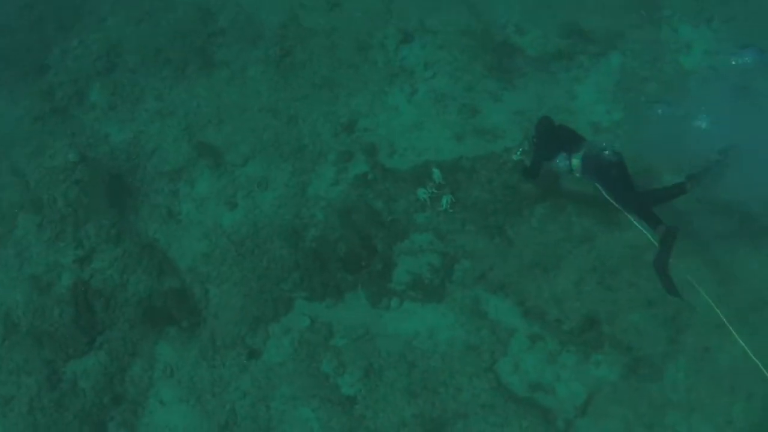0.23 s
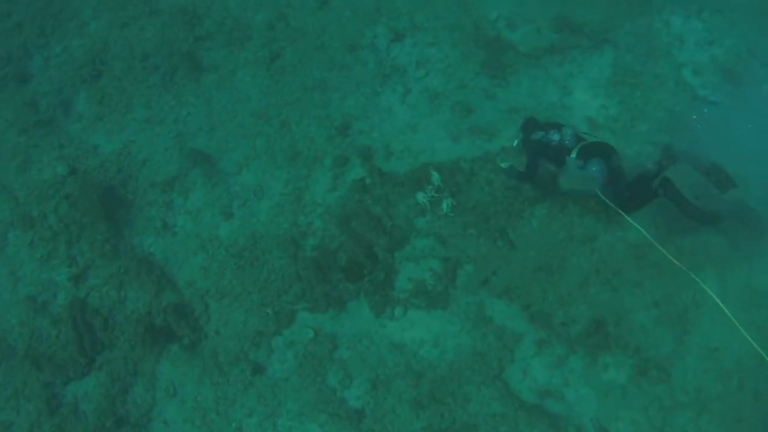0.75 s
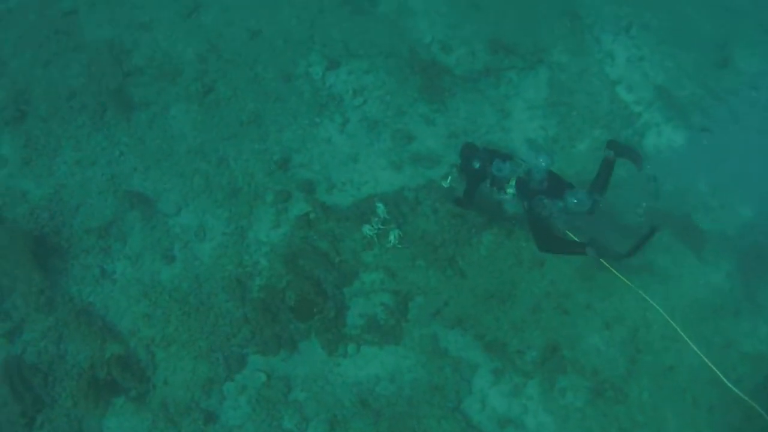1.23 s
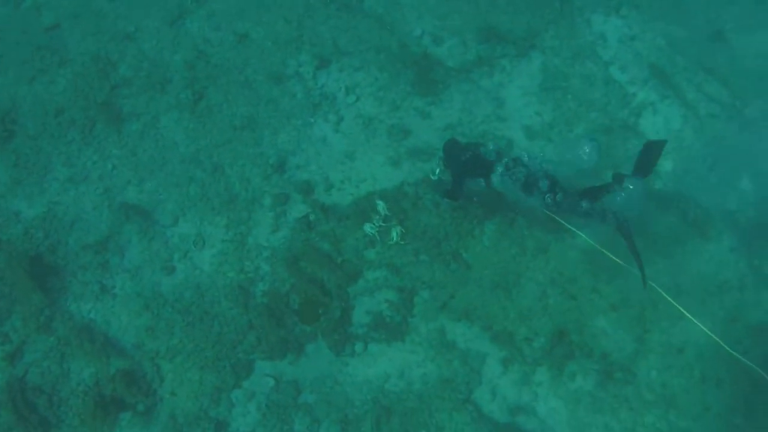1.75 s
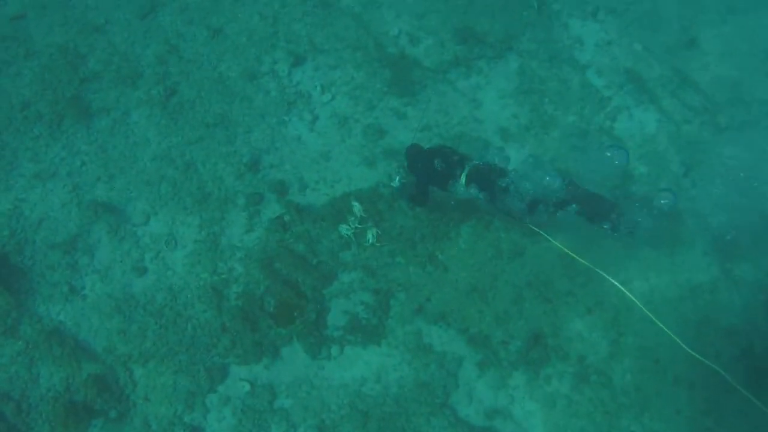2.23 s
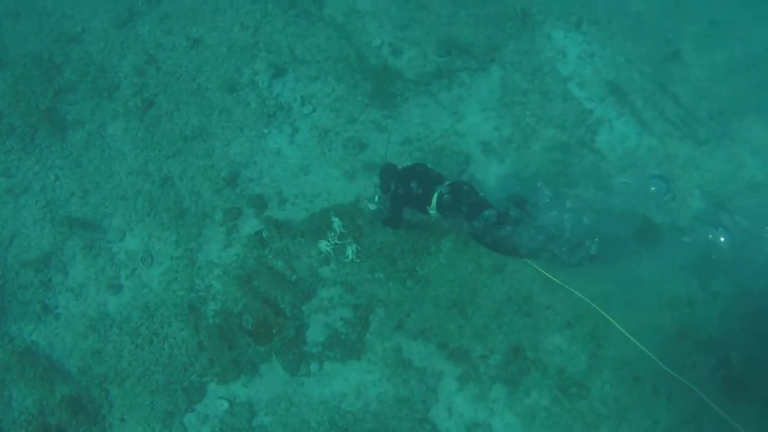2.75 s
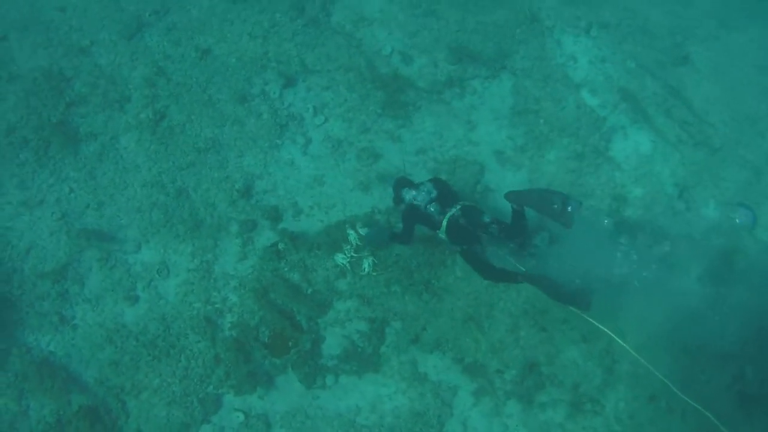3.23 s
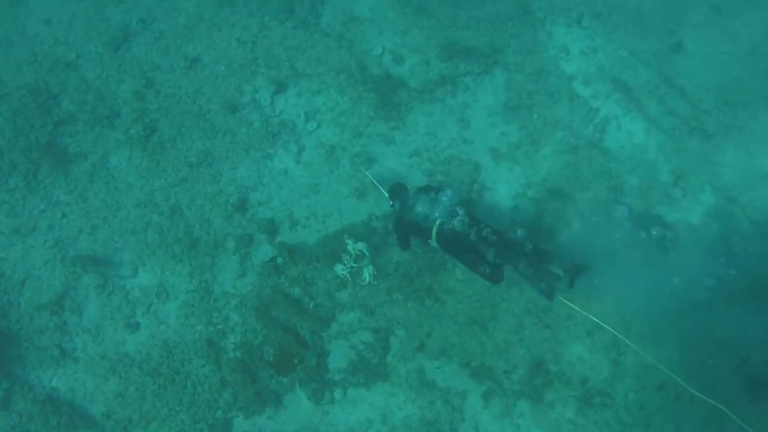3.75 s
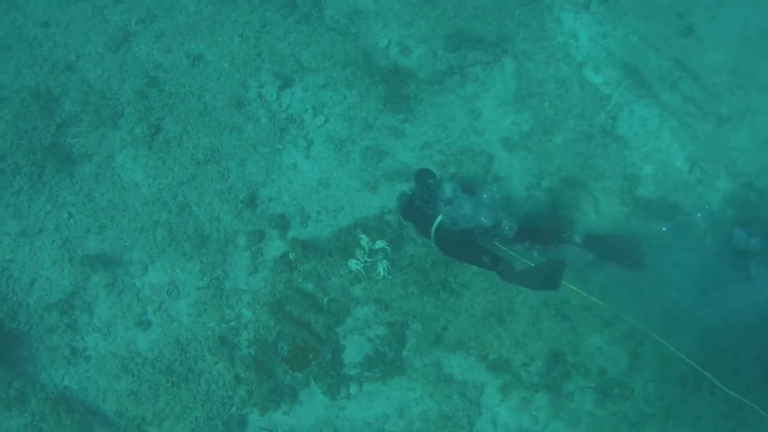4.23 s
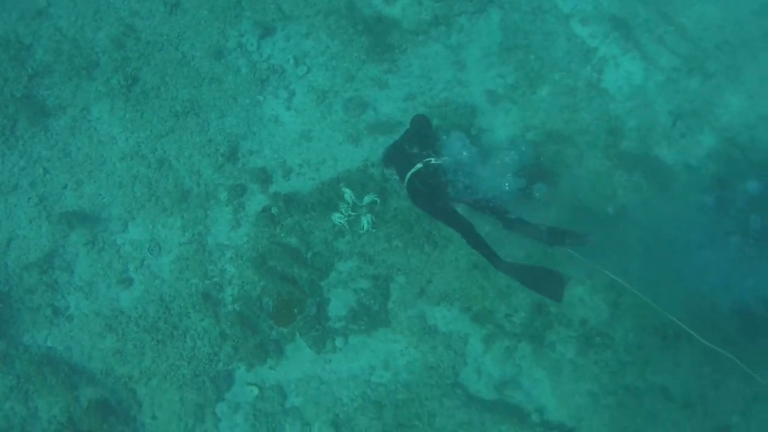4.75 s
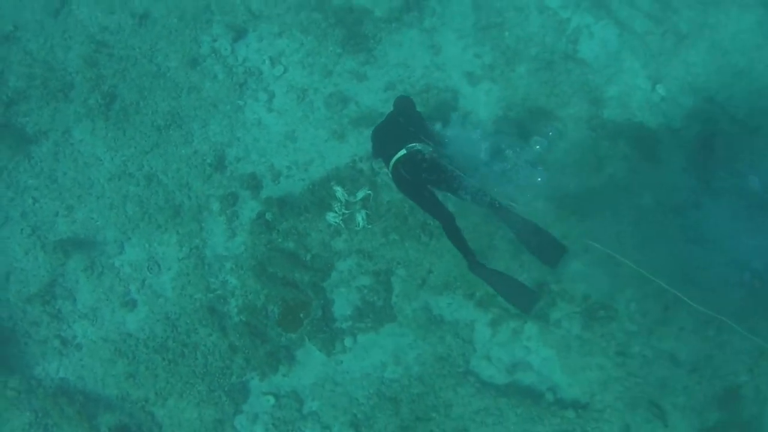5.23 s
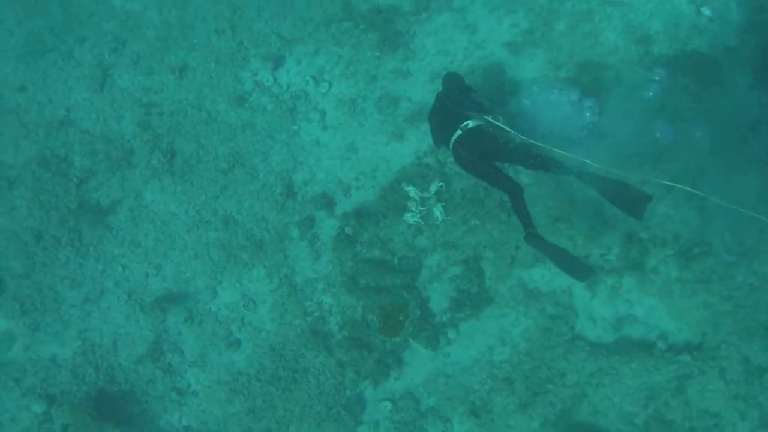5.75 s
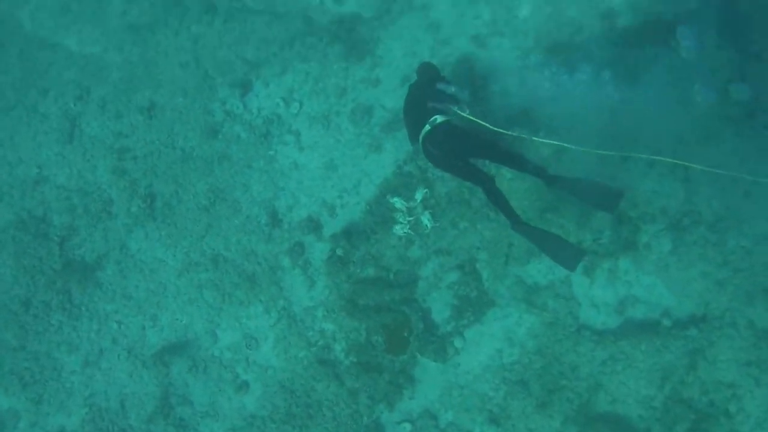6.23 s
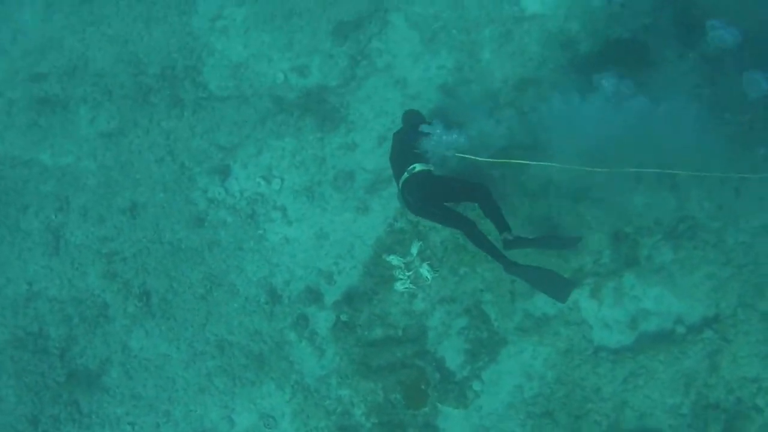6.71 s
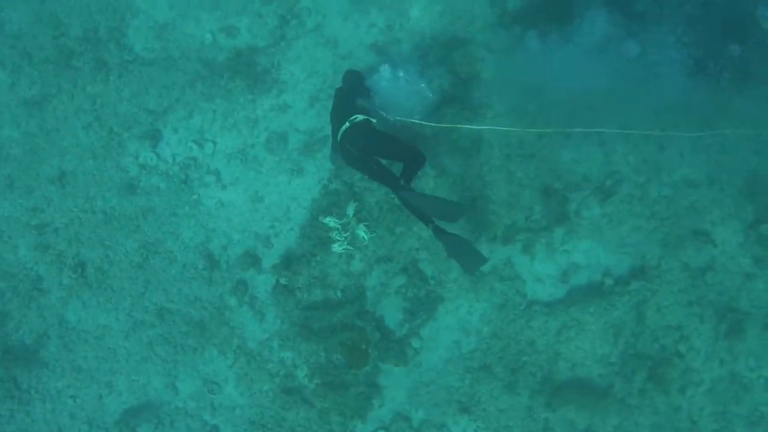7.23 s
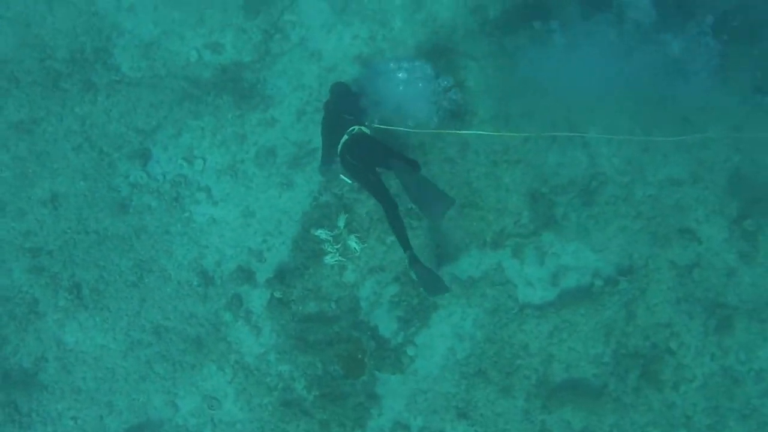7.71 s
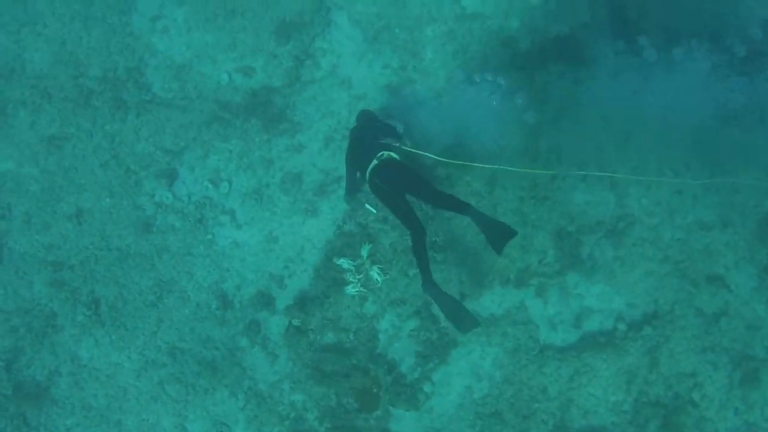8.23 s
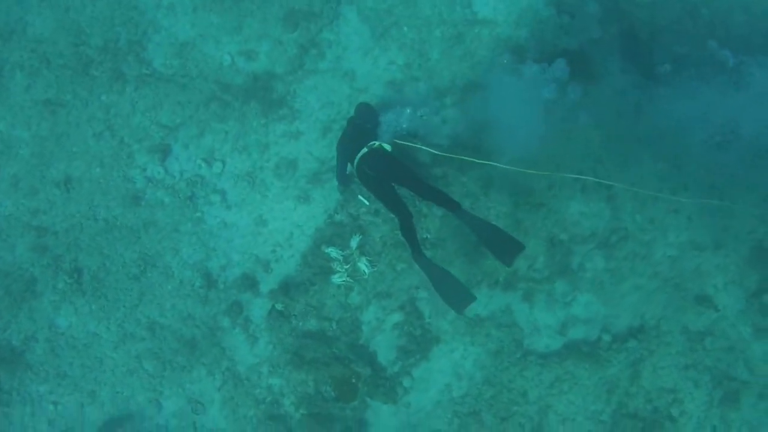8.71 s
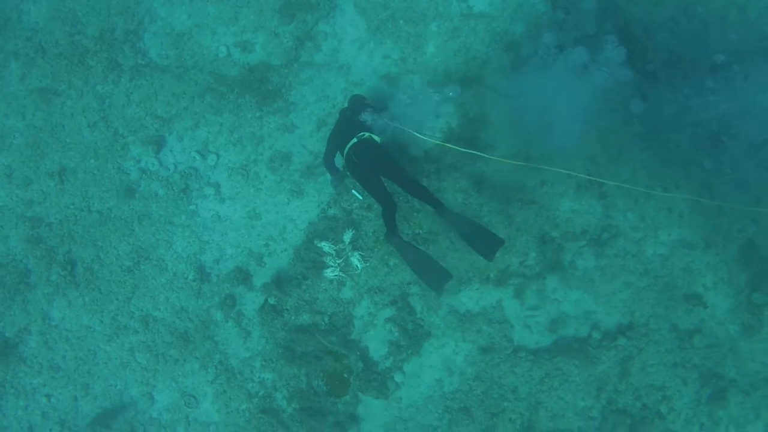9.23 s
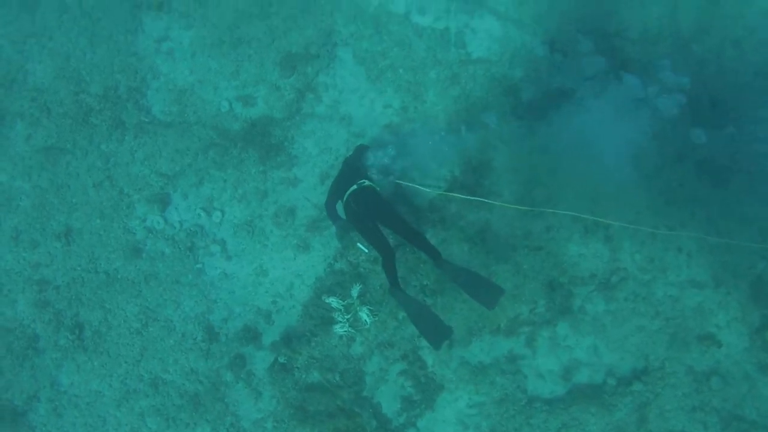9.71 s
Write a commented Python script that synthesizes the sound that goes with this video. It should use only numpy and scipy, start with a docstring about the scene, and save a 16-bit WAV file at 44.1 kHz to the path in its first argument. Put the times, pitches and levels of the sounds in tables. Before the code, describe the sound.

At the sea surface, bright bubble pops, gulping slop and a few spray snaps crowd the first second. The microphone then goes under inside its housing, and loud, round, hollow knocks begin, often in close pairs, five to nine a second. Each swells into a short, almost pure mid-pitched ring with a little plastic rattle, above a dull wash and low rumble that continue to the end.

```python
"""Quick uneven knocks heard inside an underwater camera's housing: a trapped air pocket at the microphone
swells into near-sine rings round 660 Hz, while the housing rattles as decaying noise and modes. At first the
camera dips under the sea surface: pops, swelling bubbles and slop are ringing sines, snaps and ticks are short
noise. Filtered noise makes the muffled wash, rumble and wavering hums."""
import sys
import numpy as np
from scipy import signal
from scipy.fft import rfft, irfft, next_fast_len
from scipy.io import wavfile

SR = 44100
rng = np.random.default_rng(int(sys.argv[2]) if len(sys.argv) > 2 else 0)


def wav_record(signal):
    """Record a signal, one row per channel, as 16-bit PCM in the file named by sys.argv[1]."""
    frames = np.transpose(np.atleast_2d(signal))
    bounded = np.clip(frames, -1, 1)
    # unit amplitude maps onto the largest positive 16-bit level
    quanta = np.round(bounded * 32767).astype(np.int16)
    wavfile.write(sys.argv[1], SR, quanta)


N = 439677
TIME_S = np.arange(N) / SR

# bubbles popping at the housing: t/s, level/dB, f/Hz
POP_EVENTS = [(0.0015, 1.5, 2250), (0.0075, -3, 3850), (0.021, -6, 4330), (0.031, -13, 3200),
              (0.056, 0, 2220), (0.057, -8.5, 1320), (0.078, -12, 1300), (0.096, -5.5, 1010),
              (0.12, -3, 2120), (0.124, -2.5, 1760), (0.156, -9, 1220), (0.1755, -1.5, 3440),
              (0.1756, -6, 2020), (0.1944, -10, 810), (0.212, -12, 3200), (0.22, -18, 5670),
              (0.216, -9.5, 1050), (0.248, -10, 785), (0.254, -11, 3230), (0.279, -11, 2900),
              (0.306, -11, 2770), (0.305, -14, 584), (0.381, -1.5, 775), (0.381, -21, 3550),
              (0.406, -10.5, 1310), (0.4412, -6.5, 950), (0.454, -6.5, 2420), (0.4653, -6.5, 1990),
              (0.5274, -0.5, 5270), (0.5557, -3.5, 1050), (0.671, -9, 2080), (0.6695, -4, 900),
              (0.673, -10, 4300), (0.7053, -4, 830), (0.708, -0.5, 1970), (0.734, -6.5, 1160),
              (0.738, -10, 2150), (0.786, -11.5, 1540), (0.796, -9.5, 760), (0.799, -11, 2250),
              (0.8094, -7.5, 2080), (0.897, -9, 996), (0.9031, -1, 2300), (0.906, -9, 3570),
              (0.9416, 0, 960), (1.182, -23.5, 3500), (1.343, -22, 5600), (1.495, -16.5, 1610),
              (1.6193, -9, 1340), (1.652, -9.5, 2010), (2.2745, -18.5, 2266), (2.642, -10, 11000),
              (3.4337, -12, 2350), (3.943, -15, 2269), (5.248, -27, 1310), (5.427, -27, 2700)]
# slop at the surface: t/s, level/dB
SLOP_LEVEL = [(0, -32.5), (.35, -25), (.5, -30), (.6, -37.5), (.7, -33), (.95, -38), (1.0, -50),
              (1.5, -36.5), (3.6, -34.5), (4.2, -51)]
# the sea: t/s, wash level/dB, rumble level/dB
SEA_LEVELS = [(0, -31, -40), (.9, -50, -41), (1.02, -48.5, -44), (1.5, -40, -38.5), (2.17, -47, -45.5),
              (3.3, -38, -34.5), (4.44, -40.5, -44), (5.08, -48, -46), (6.4, -40, -42.5), (7.3, -43, -44.5),
              (7.8, -38.5, -38), (8.25, -30.5, -35.5), (8.8, -41.5, -44), (9.2, -43, -44.5),
              (9.97, -31.5, -37.5)]
# wash spectrum, relative: f/Hz, density/(dB per Hz)
WASH_SPECTRUM = [(150, -7.5), (460, -0.5), (800, 5.5), (1130, -9.5), (1400, -0.5), (2250, 5), (2600, -15),
                 (2900, -5), (3250, -15.5), (4200, -13.5), (5100, -24.5), (5600, -17.5), (6200, -30.5),
                 (7300, -21), (8800, -39), (14300, -44.5)]
# rumble spectrum, relative: f/Hz, density/(dB per Hz)
RUMBLE_SPECTRUM = [(12, -29), (35, 0.5), (60, -12.5), (96, -2), (130, -15), (250, -15), (500, -35)]
# dry, wide snaps of spray at the surface: t/s, level/dB
SPRAY_SNAPS = [(0.029, -15), (.132, -32), (.158, -16), (.2105, -27), (.398, -36), (0.519, -23),
               (0.699, -31), (.829, -35)]
# knocks heard through the housing: t/s, pocket level/dB, swell/ms, then time to fall 12 dB/ms
KNOCKS = [(0.119, -10, 12, 20), (0.288, -18, 18, 12), (0.485, -20, 12, 20), (0.517, -7, 14, 20),
          (0.712, -27, 12, 16), (0.7353, -9, 18, 25.5), (0.914, -20, 6.3, 25),
          (0.947, -14.5, 8.4, 15.5), (1.11, -26, 9.2, 40), (1.1417, -19, 1.9, 67.5),
          (1.321, -8, 79, 23), (1.3547, -7, 3.7, 7), (1.5276, -2.5, 14, 20), (1.5612, -1, 11, 6),
          (1.7339, -2, 16, 22), (1.7649, -1.5, 6.9, 19.5), (1.9283, -4.0, 16, 61),
          (1.9609, -2.5, 10.7, 27), (2.1411, -9, 8.7, 20), (2.1736, -1.5, 12, 24),
          (2.3357, -10, 18, 15), (2.3702, -2, 10.7, 22), (2.5438, -8, 7.6, 22),
          (2.5724, -0.5, 8.4, 24.5), (2.723, -8.5, 14, 23), (2.7573, -5, 10, 37.5),
          (2.8634, -15, 9.4, 25), (2.9008, -6, 11, 23), (3.0193, -8.5, 10, 44),
          (3.0574, -2, 8.9, 24), (3.166, -9.5, 4.6, 43), (3.2034, -1.5, 12.2, 21.5),
          (3.3191, -6.5, 11.1, 9.5), (3.4295, -1.5, 20, 17), (3.4636, -5.5, 18, 16),
          (3.6466, -4, 9.3, 37), (3.6769, -9, 11, 15.5), (3.8391, -12, 7.6, 7),
          (3.8676, 0.5, 7.4, 24), (3.944, -13, 13, 25), (4.0467, -2.5, 16, 29),
          (4.073, -2.5, 13.5, 27.5), (4.2045, -1.5, 20, 16.5), (4.2317, -0.5, 12.3, 24.5),
          (4.3641, -10, 16, 45), (4.4502, -1, 14.6, 37), (4.478, -8, 15, 23),
          (4.6207, -1.5, 11.6, 48), (4.8167, -2, 20, 26), (4.8444, -0.5, 8.7, 20),
          (5.0243, -4, 19.8, 31.5), (5.1328, -5, 19.7, 12), (5.1602, -2, 11.7, 18),
          (5.2931, -7, 16, 22), (5.3786, -1.5, 11.5, 7.5), (5.4048, -11, 16.6, 12),
          (5.5658, -5, 18, 20), (5.5931, -1.5, 8.5, 18), (5.7301, -4.5, 13.8, 29.5),
          (5.8166, -1.5, 9, 17), (5.8977, -5, 16.4, 35), (6.0409, -3, 8.2, 19),
          (6.1804, -6, 15, 15), (6.2077, -13.5, 6.4, 20), (6.3183, -1.5, 9.1, 15.5),
          (6.3437, -5, 19.6, 21), (6.5254, -7.5, 9.6, 46), (6.5529, -0.5, 18, 24.5),
          (6.6775, -9.5, 7.9, 24), (6.7017, -8.5, 23.2, 21), (6.7569, -1.5, 16.4, 19.5),
          (6.8838, -3, 10.4, 11), (6.9098, -4, 22, 25.5), (7.0736, -1.5, 17, 20),
          (7.1004, -0.5, 8.7, 22.5), (7.2299, -16, 22.7, 30), (7.3171, -8, 9.2, 18.5),
          (7.3446, -9, 19.3, 20.5), (7.4861, -4, 10.2, 11), (7.5116, -9, 14, 19),
          (7.6666, -15.5, 12, 32), (7.8047, -12, 6.2, 28), (7.9978, -16.5, 30, 37),
          (8.0256, -2.5, 7.4, 8), (8.2043, -10, 13, 45), (8.2352, -20, 5.3, 22),
          (8.2873, -3, 9.7, 5), (8.3133, -3, 17.4, 19), (8.472, -3, 15, 28),
          (8.5008, 1, 12.8, 15.5), (8.5373, -13, 15.7, 13), (8.6347, -9, 14, 37),
          (8.7236, -1.5, 10, 39), (8.7512, -7, 20.4, 16), (8.8969, -1, 11.3, 38),
          (9.0737, -11, 12.6, 20.5), (9.1034, -3, 21.2, 21.5), (9.2534, -18.5, 11, 19),
          (9.2838, -10.5, 19.5, 19.5), (9.4315, -12, 15, 11), (9.4577, -13.5, 18.7, 23),
          (9.6431, -7, 10.7, 10), (9.6682, -10, 23.5, 17.5), (9.8472, -13.5, 8.5, 37),
          (9.8746, -4, 17.6, 23)]
# housing rattle for a 0 dB knock: t/s, level/dB
RATTLE_LEVEL = [(0.74, -24.5), (1.4, -28), (2.1, -31), (2.6, -28), (3.45, -23.5), (4.1, -31.5), (5.1, -35),
                (6.5, -34), (7.3, -37.5), (7.9, -23), (8.4, -32), (9.1, -34.5), (9.8, -23)]
# rattle spectrum under water, relative: f/Hz, density/(dB per Hz)
RATTLE_SPECTRUM = [(500, 9), (1040, -1), (1900, -4), (2300, -14), (2700, -3.5), (3260, -6), (4200, 2),
                   (5000, -14.5), (5500, -12.5), (6200, -16), (6900, 2.5), (7700, -2.5), (8900, -16.5),
                   (10000, -10.5), (11700, -24), (15600, -30.5)]
# housing modes: f/Hz, relative level/dB, t60/s
HOUSING_MODES = [(1665, 3.5, 0.064), (1368, -3.5, 0.094), (1870, -3, 0.058), (775, 5, 0.078),
                 (2120, 1.5, 0.022), (3970, -18, 0.027), (5500, -12.5, 0.0085), (7170, -11.5, .02),
                 (4260, -17.5, 0.013)]
# soft bubbles that swell and fade without a crack: t/s, level/dB, f/Hz, length/ms
SOFT_BUBBLES = [(.315, -22, 697, 19), (.348, -14, 1048, 18), (.515, -20, 697, 29), (.65, -18, 700, 14),
                (.825, -21.5, 775, 15), (.85, -24.5, 2130, 13), (1.24, -19, 723, 28),
                (1.425, -23.5, 762, 28), (1.51, -19, 800, 26), (7.69, -18.5, 775, 47),
                (8.235, -16.5, 750, 38), (9.19, -21.5, 733, 40)]
# thumps of a larger hollow of air as it fills: t/s, level/dB
HOLLOW_THUMPS = [(0.4402, -7.5), (.53, -17), (0.557, -9.5), (.671, -20.5), (0.799, -22.5), (0.905, -19),
                 (0.941, -13)]
# sharp ticks, most just ahead of a knock: t/s, level/dB
SHARP_TICKS = [(0.441, -12.5), (0.6566, -22), (0.963, -19.5), (1.312, -21), (1.7255, -21), (2.133, -18.5),
               (2.165, -19), (2.33, -26), (2.5355, -15), (2.5652, -18.5), (3.009, -20), (3.045, -18),
               (3.156, -20), (3.308, -22), (3.384, -31), (3.433, -17), (3.465, -14), (3.592, -24.5),
               (3.944, -18)]
# faint squeaks, each followed by a plop: t/s, level/dB
FAINT_SQUEAKS = [(1.299, -50), (1.509, -50), (1.713, -49), (2.12, -52), (2.325, -48.5), (2.525, -46),
                 (2.999, -51), (3.144, -52), (3.299, -44.5)]
# pocket pitch as the housing moves in depth: t/s, f/Hz
POCKET_PITCH = [(0.74, 747), (0.94, 743), (1.14, 668), (1.36, 683), (1.53, 600.8), (2.0, 660),
                (2.45, 660.4), (3.2, 649.2), (3.95, 667.4), (4.55, 645.8), (5.35, 679.8), (6.2, 680.4),
                (6.8, 664.7), (7.2, 666.4), (7.55, 682), (8.2, 676.3), (8.75, 646.2), (9.25, 682),
                (9.9, 677.5)]
# higher ring of the pocket, beating with the first: t/s, level relative to the first/dB, f/Hz
UPPER_RING = [(1, 4, 777.6), (1.5, -23.5, 793), (7, -32.5, 781), (7.6, -6, 779), (8.3, -12.5, 795),
              (8.7, -39, 780), (9.1, -25, 755), (9.3, 2.5, 775), (9.6, -7, 815), (9.85, 7.5, 754.5)]
# further swells of the pocket, mostly in the wake of a knock: t at peak/s, level/dB
POCKET_RESURGES = [(1.38, -18.5), (1.598, -11.5), (1.811, -15), (3.502, -21), (3.721, -9), (3.82, -20.5),
                   (5.335, -17), (5.768, -11), (5.863, -14), (6.817, -15.5), (8.462, -17)]
# how hard the water stirs the pocket: t/s, level/dB
STIR_LEVEL = [(.8, -62), (1.0, -48), (1.45, -34.5), (1.7, -25), (2.25, -36.5), (3.0, -27.5), (5.6, -32.5),
              (6.2, -34.5), (6.77, -26.5), (7.59, -37.5), (8.59, -25.5), (9.44, -38.5), (9.97, -36)]
# hum of the hollow as it shrinks: t/s, f/Hz, level/dB
HOLLOW_HUM_TRACK = [(.4, 454, -60), (.6, 462, -44), (1.0, 471, -49), (1.14, 508.3, -43), (1.35, 524, -33),
                    (1.6, 523, -49)]

DIVE_S = 1.0   # then small slop bubbles stop and the rattle's hiss takes on colour
REBOUND_S = 0.045   # a knock this soon after another is a rebound
POP_T60_AT_1KHZ_S, POP_SIZE_LAW = 0.021, 0.88   # t60 falls as pitch to this power
SLOSH_DB = -13.5   # relative to the slop's bubbles
RATTLE_DB_PER_KNOCK_DB, REBOUND_RATTLE_DB = 0.46, -2
# random nudges of the water and a steady tremor, relative to RATTLE_LEVEL
NUDGES_PER_S, NUDGE_DB, TREMOR_DB, TREMOR_BEFORE_DIVE_DB = 45, -23, -34, 4.0
MODES_DB, MODES_FIRM_S, MODES_LOOSE_DB = -22, 4.0, -3.5   # weaker before they firm up
HOLLOW_HZ, HOLLOW_T60_S = 462, 0.11
SQUEAK_LOWEST_HZ, SQUEAK_S = 6960, 0.016
PLOP_AFTER_S, PLOP_CLICK_OVER_SQUEAK_DB, PLOP_HZ, PLOP_T60_S = 0.013, 36.5, 1700, 0.0072
POCKET_FORMS_S = 0.72   # earlier knocks only rattle
# a ring that falls or swells faster than usual sounds sharper
USUAL_FALL_MS, HZ_PER_FALL_MS = 20.7, -0.5
USUAL_SWELL_MS, HZ_PER_SWELL_MS = 13, -0.4
FALL_ROUNDNESS = 1.27
UPPER_HOLD_S, UPPER_T60_S, UPPER_REBOUND_DB = 0.012, 0.068, -10.5
RESURGE_S = 0.04
POCKET_WIDTH_HZ, UPPER_WIDTH_HZ, HOLLOW_WIDTH_HZ = 32, 28.0, 30.0
UPPER_STIR_DB = -8
HUSH_S, HUSH_DEPTH = 0.036, 0.34
CUTOFF_HZ = 16300


def from_db(db):
    """Decibels to gain."""
    return 10 ** (np.asarray(db) / 20)


def rms_one(x):
    """Scale to rms 1."""
    return x / np.sqrt(np.mean(x ** 2) + 1e-20)


def in_time(rows):
    """Table columns as curves, one value a sample."""
    t_s, *columns = np.transpose(rows)
    return [np.interp(TIME_S, t_s, column) for column in columns]


def impulses(events):
    """One click per (time, level) row."""
    clicks = np.zeros(N)
    clicks[[round(t_s * SR) for t_s, db in events]] = from_db([db for t_s, db in events])
    return clicks


def drift(rate_hz):
    """Noise through two poles at rate_hz, made at SR/40; rms 1 before interpolation."""
    r = np.exp(-80 * np.pi * rate_hz / SR)
    slow = signal.lfilter([1], [1, -2 * r, r * r], rng.standard_normal(N // 40 + 2002))
    slow = slow[2000:]   # drop the filter's start
    return np.interp(np.arange(N) / 40, np.arange(len(slow)), rms_one(slow))


def coloured(spectrum):
    """Noise with the given spectrum, falling steeply beyond its ends; rms 1."""
    size = next_fast_len(N)
    log_hz = np.log(np.maximum(np.arange(size // 2 + 1) * SR / size, 1))
    hz, db = np.transpose(spectrum)
    at = np.log(hz)
    gain_db = np.interp(log_hz, at, db)
    gain_db -= 20 * np.maximum(at[0] - log_hz, 0) + 20 * np.maximum(log_hz - at[-1], 0)
    return rms_one(irfft(rfft(rng.standard_normal(size)) * from_db(gain_db), size)[:N])


def band(x, low_hz, high_hz):
    """Gentle band-pass."""
    return signal.sosfilt(signal.butter(2, [low_hz, high_hz], "band", fs=SR, output="sos"), x)


def ring(force, hz, t60_s):
    """Resonator: a unit click starts a decaying sine of height 1."""
    r, w = from_db(-60 / (t60_s * SR)), 2 * np.pi * hz / SR
    return signal.lfilter([0, np.sin(w)], [1, -2 * r * np.cos(w), r * r], force + 1e-18)


def dying(steps, t60_s):
    """Envelope: each click jumps up and decays exponentially."""
    return signal.lfilter([1], [1, -from_db(-60 / (t60_s * SR))], steps + 1e-18)


def pops():
    """A bubble rings briefly, its pitch rising early on, with a small dull crack."""
    out, t = np.zeros(N + SR), np.arange(round(.2 * SR)) / SR
    cracks = band(rng.standard_normal((len(POP_EVENTS), len(t))), 360, 3200)
    cracks *= from_db(-60 * t / 0.011 - 11)
    onset = np.sin(np.pi / 2 * np.minimum(t / 0.00073, 1)) ** 2
    for (t_s, db, hz), crack in zip(POP_EVENTS, cracks):
        t60_s = POP_T60_AT_1KHZ_S * (1000 / hz) ** POP_SIZE_LAW
        at = max(round((t_s - .001) * SR), 0)
        rise = 1 + 3e-5 * min(hz, 2000) * np.minimum(t / t60_s, 1)
        tone = np.sin(2 * np.pi * hz * t * rise) * from_db(-60 * t / (t60_s + 0.0015))
        out[at:at + len(t)] += from_db(db) * (tone * onset + crack)
    return band(out[:N], 320, 18000)


def slop():
    """Random clumps of bubbles, each ringing 19 cycles to -60 dB, on a dull slosh."""
    sizes = from_db(5.0 * np.minimum(rng.exponential(1, N), 2.5)) * rng.choice([-1, 1], N)
    born = rng.random(N) < 800 * from_db(4.0 * drift(15)) / SR
    pitches_hz, dealt = np.geomspace(550, 7000, 20), rng.integers(0, 20, N)
    bubbles = np.zeros(N)
    for k, hz in enumerate(pitches_hz):
        # band-limited push: a soft start, no broad tick
        push = band(sizes * born * (dealt == k) + 1e-18, hz / 1.77, hz * 1.16)
        gain = from_db(-4.0 * np.abs(np.log2(hz / 1100)))
        present = TIME_S < DIVE_S if hz > 900 else 1
        bubbles += ring(rms_one(push), hz, 19.0 / hz) * gain * present
    slosh = rms_one(band(rng.standard_normal(N), 100, 350)) * from_db(SLOSH_DB + 3.9 * drift(5.1))
    return from_db(in_time(SLOP_LEVEL)[0]) * (rms_one(bubbles) + slosh)


def sea():
    """Coloured noise: a muffled wash whose treble flickers, and a wavering low rumble."""
    wash_db, rumble_db = in_time(SEA_LEVELS)
    wash = coloured(WASH_SPECTRUM)
    body = band(wash, 100, 6300) * from_db(.8 * drift(30))
    treble = band(wash, 6300, 20000) * from_db(1.8 * drift(35))
    return from_db(wash_db) * (body + treble) + from_db(rumble_db) * coloured(RUMBLE_SPECTRUM)


def snaps():
    """Spray: noise across the treble, decaying 60 dB in 8.8 ms."""
    return dying(impulses(SPRAY_SNAPS), 0.0088) * band(rng.standard_normal(N), 2200, 9500)


def rattle():
    """Knocks and nudges make the housing hiss, treble dying first, and shake its modes."""
    level_db = in_time(RATTLE_LEVEL)[0]
    t_s, knock_db = np.transpose(KNOCKS)[:2]
    at, rebound = ((t_s + 0.0018) * SR).astype(int), np.diff(t_s, prepend=0) < REBOUND_S
    steps = np.zeros(N)
    steps[at] = from_db(level_db[at] + RATTLE_DB_PER_KNOCK_DB * knock_db + REBOUND_RATTLE_DB * rebound)
    nudges = rng.random(N) < NUDGES_PER_S / SR
    nudges = nudges * from_db(level_db + NUDGE_DB + 3.0 * rng.standard_normal(N))
    steps += signal.lfilter([.012], [1, -.988], nudges * (TIME_S > DIVE_S))   # soft landing
    steps = signal.lfilter([.03], [1, -.97], steps) * 1.46   # a blow lands over about 1 ms

    under = coloured(RATTLE_SPECTRUM)
    above = 1.2 * band(rng.standard_normal(N), 1500, 8300)
    noise = np.where(TIME_S < DIVE_S, above, under / np.std(band(under, 3100, 12000)))
    tremor = from_db(level_db + TREMOR_DB + TREMOR_BEFORE_DIVE_DB * (TIME_S < DIVE_S))
    out = np.zeros(N)
    for low_hz, high_hz, t60_s in [(610, 2870, 0.12), (2900, 5800, 0.076), (5840, 20000, 0.056)]:
        blow = dying(steps, t60_s) + tremor
        out += blow * from_db(2.0 * drift(34)) * band(noise, low_hz, high_hz)

    shake = signal.lfilter([.006], [1, -.994], dying(steps, 0.055)) * 1.234
    shake *= rng.standard_normal(N)
    loose_db = MODES_LOOSE_DB * (TIME_S < MODES_FIRM_S)
    for hz, db, t60_s in HOUSING_MODES:
        out += from_db(db + MODES_DB + 3.0 * drift(2.9) + loose_db) * ring(shake, hz, t60_s)
    return out


def swells():
    """Soft bubbles are short swelling sines; each thump rings the hollow."""
    out = np.zeros(N)
    for t_s, db, hz, length_ms in SOFT_BUBBLES:
        t = np.arange(round(length_ms * SR / 1000)) / SR
        shape = np.sin(1000 * np.pi * t / length_ms) ** 2
        at = round(t_s * SR)
        out[at:at + len(t)] += from_db(db) * shape * np.sin(2 * np.pi * hz * t)
    return out + ring(impulses(HOLLOW_THUMPS), HOLLOW_HZ, HOLLOW_T60_S)


def ticks():
    """Ticks are bursts of bright noise; a squeak is a sine dipping and rising in pitch, then a plop."""
    squeaks, plops = np.zeros((2, N))
    u = np.linspace(-1, 1, round(SQUEAK_S * SR))
    hz = SQUEAK_LOWEST_HZ * (1 + 0.11 * np.abs(u))
    glide = np.sin(2 * np.pi * np.cumsum(hz) / SR) * (1 - u ** 2)
    for t_s, db in FAINT_SQUEAKS:
        at = round((t_s - SQUEAK_S / 2) * SR)
        squeaks[at:at + len(u)] += from_db(db) * glide
        plops[round((t_s + PLOP_AFTER_S) * SR)] = from_db(db + PLOP_CLICK_OVER_SQUEAK_DB)
    plops = ring(band(plops + 1e-18, PLOP_HZ / 2, PLOP_HZ * 2), PLOP_HZ, PLOP_T60_S)
    bursts = dying(impulses(SHARP_TICKS), 0.022) * band(rng.standard_normal(N), 1000, 4700)
    return squeaks + plops + 0.87 * bursts


def pocket_rings():
    """Each knock swells the trapped air into a near-sine; the next knock takes the pocket over."""
    out, t = np.zeros(N), np.arange(round(.2 * SR)) / SR
    pitch_hz = in_time(POCKET_PITCH)[0]
    upper_db, upper_hz = in_time(UPPER_RING)
    upper_fall = from_db(-60 * np.maximum(t - UPPER_HOLD_S, 0) / UPPER_T60_S)
    rebounds = np.diff([knock[0] for knock in KNOCKS], prepend=0) < REBOUND_S
    phases = rng.uniform(0, 2 * np.pi, len(KNOCKS))
    for (t_s, db, swell_ms, fall_ms), phase, rebound in zip(KNOCKS, phases, rebounds):
        at = round(t_s * SR)
        hz = pitch_hz[at] + HZ_PER_FALL_MS * (fall_ms - USUAL_FALL_MS)
        hz += HZ_PER_SWELL_MS * (swell_ms - USUAL_SWELL_MS)
        swell = np.sin(np.pi / 2 * np.clip(1000 * t / swell_ms, 0, 1)) ** 2
        fall = from_db(-12 * np.maximum((1000 * t - swell_ms) / max(fall_ms, 3), 0) ** FALL_ROUNDNESS)
        main = fall * np.sin(2 * np.pi * hz * t + phase)
        upper_gain = from_db(upper_db[at] + UPPER_REBOUND_DB * rebound)
        upper = upper_gain * upper_fall * np.sin(2 * np.pi * upper_hz[at] * t)
        tone = (t_s > POCKET_FORMS_S) * from_db(db) * swell * (main + upper)
        span = out[at:at + len(t)]
        span[:] = span * (1 - swell[:len(span)]) + tone[:len(span)]
    return out


def hum(hz, width_hz):
    """Narrow noise round a moving pitch, its level wavering."""
    stir = rng.standard_normal(N) + 1j * rng.standard_normal(N)
    stir = signal.sosfilt(signal.butter(3, width_hz, fs=SR, output="sos"), stir)
    waver = from_db(2.5 * drift(14))
    return waver * rms_one((stir * np.exp(2j * np.pi * np.cumsum(hz) / SR)).real)


def murmur():
    """Stirring water makes the pocket hum at both its pitches; the hollow hums too."""
    upper_db, upper_hz = in_time(UPPER_RING)
    upper = from_db(upper_db + UPPER_STIR_DB) * hum(upper_hz, UPPER_WIDTH_HZ)
    hollow_hz, hollow_db = in_time(HOLLOW_HUM_TRACK)
    pocket = hum(in_time(POCKET_PITCH)[0], POCKET_WIDTH_HZ) + upper
    hollow = from_db(hollow_db) * hum(hollow_hz, HOLLOW_WIDTH_HZ)
    return from_db(in_time(STIR_LEVEL)[0]) * pocket + hollow


def hush():
    """Gain that dips, deepest HUSH_S / 2 ahead of each knock that is not a rebound."""
    t_s = np.array([knock[0] for knock in KNOCKS])
    lone_s = t_s[np.diff(t_s, prepend=0) > REBOUND_S]
    marks = np.zeros(N)
    marks[((lone_s - HUSH_S / 2) * SR).astype(int)] = HUSH_DEPTH
    return 1 - signal.fftconvolve(marks, np.hanning(round(2 * HUSH_S * SR)), "same")


def resurges(rings):
    """Smooth swells at the pocket's pitch take over from the dying rings."""
    out = rings.copy()
    phase = 2 * np.pi * np.cumsum(in_time(POCKET_PITCH)[0]) / SR
    shape = np.hanning(round(RESURGE_S * SR))
    for t_s, db in POCKET_RESURGES:
        start = round(t_s * SR) - len(shape) // 2
        span = slice(start, start + len(shape))
        out[span] = out[span] * (1 - shape) + from_db(db) * shape * np.sin(phase[span])
    return out


def scene():
    """Sum of all sources at the one microphone inside the housing."""
    pocket = resurges(pocket_rings()) + hush() * murmur()
    housing = rattle() + ticks()
    surface = snaps() + pops() + swells() + slop()
    return (pocket + housing + surface + sea())[None]


def record(dry):
    """Peaks are rounded, the top is cut."""
    rounded = 1.3 * np.tanh(dry / 1.3)
    return signal.sosfilt(signal.cheby2(12, 70, CUTOFF_HZ, fs=SR, output="sos"), rounded)


dry = scene()
out = record(dry)
wav_record(out)
```